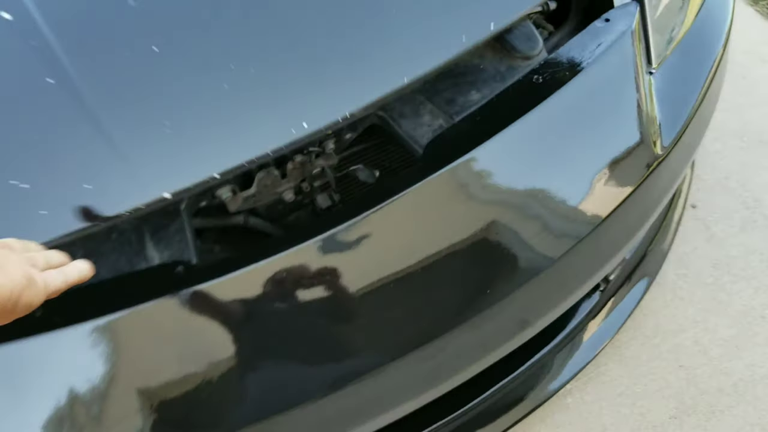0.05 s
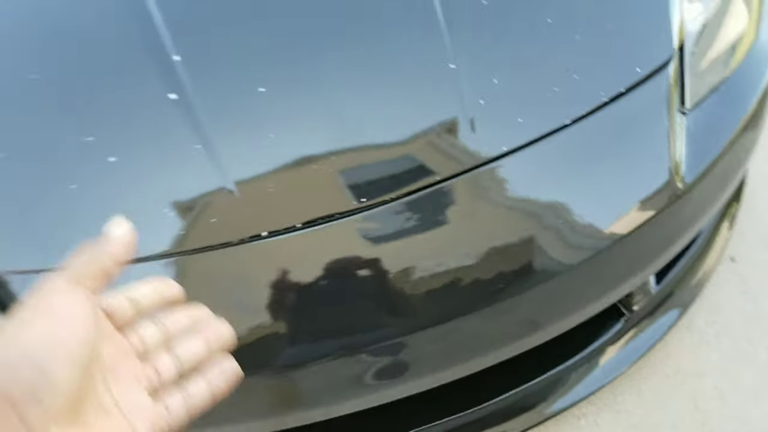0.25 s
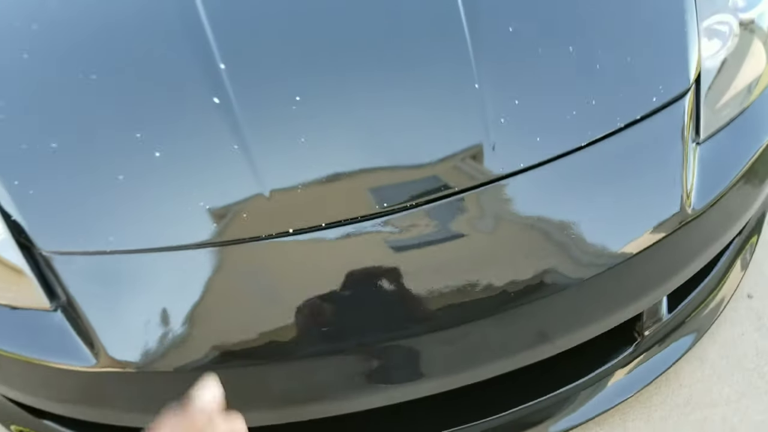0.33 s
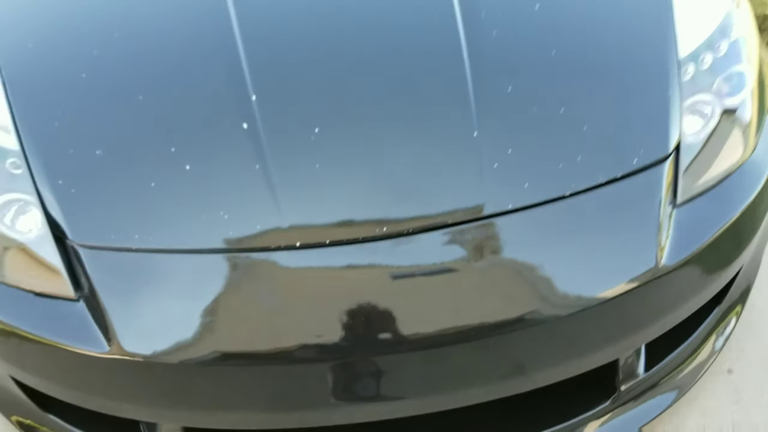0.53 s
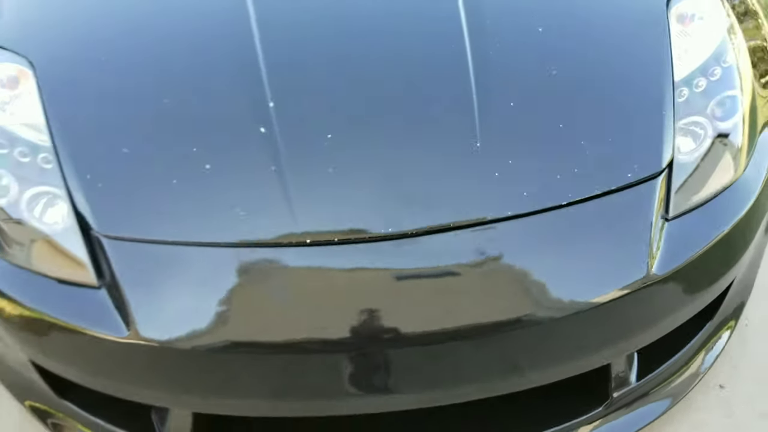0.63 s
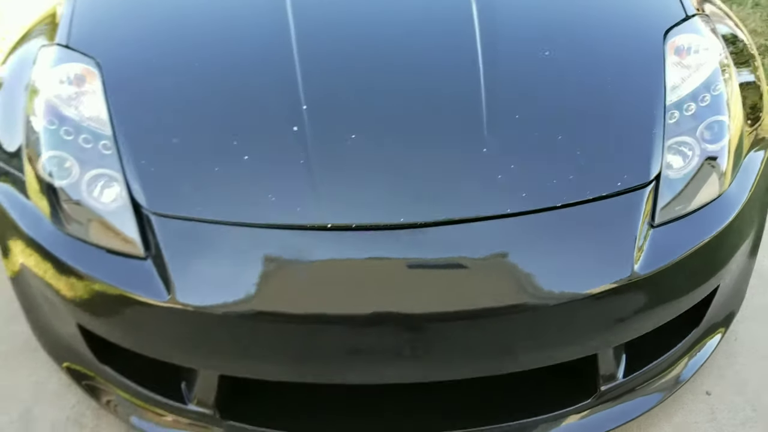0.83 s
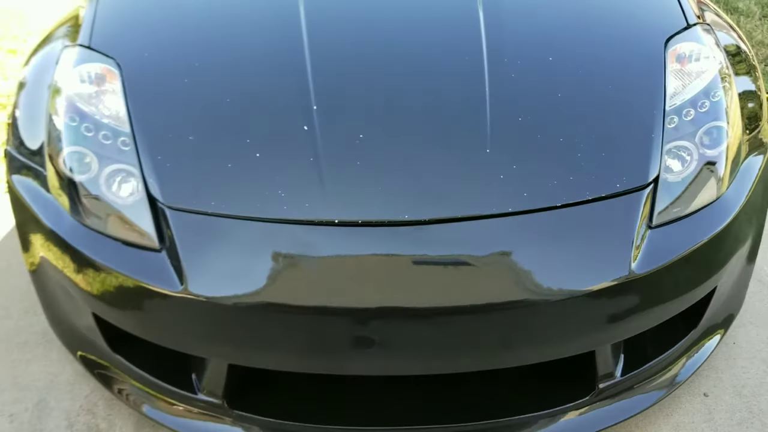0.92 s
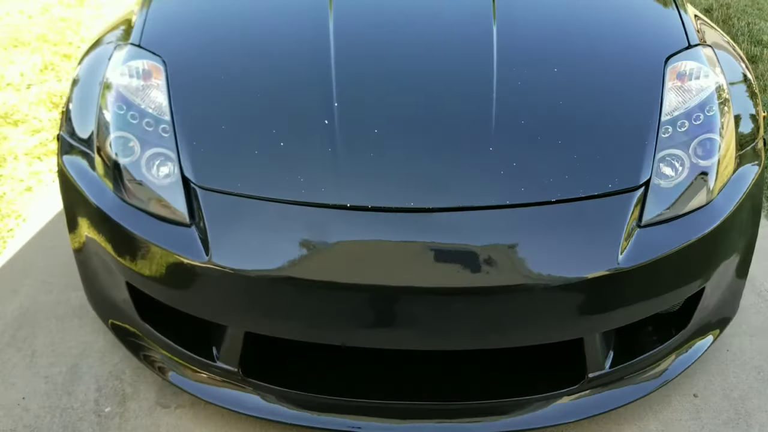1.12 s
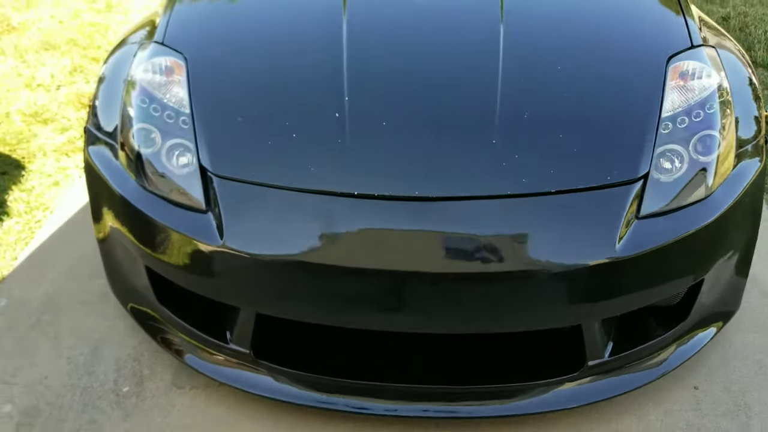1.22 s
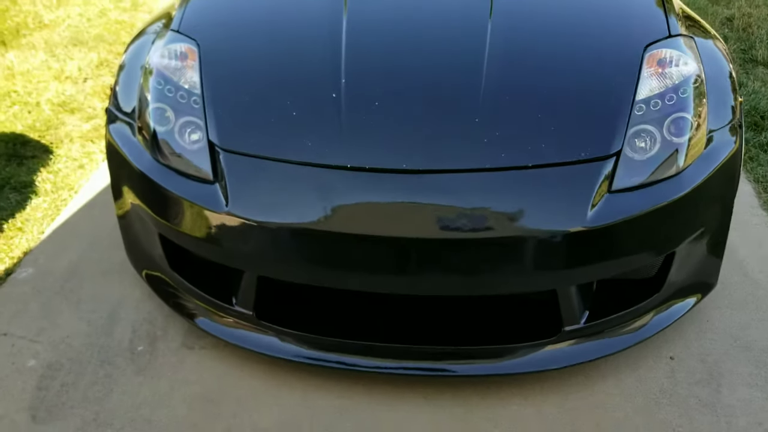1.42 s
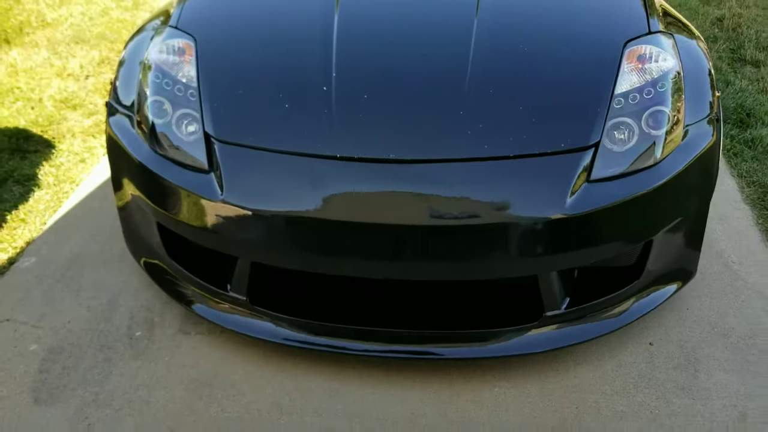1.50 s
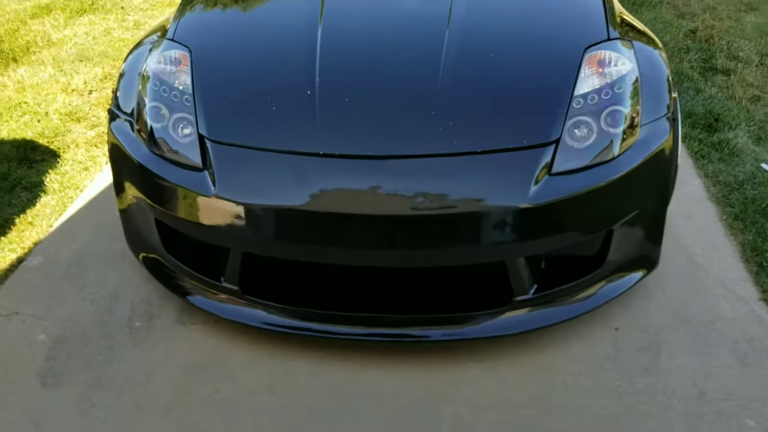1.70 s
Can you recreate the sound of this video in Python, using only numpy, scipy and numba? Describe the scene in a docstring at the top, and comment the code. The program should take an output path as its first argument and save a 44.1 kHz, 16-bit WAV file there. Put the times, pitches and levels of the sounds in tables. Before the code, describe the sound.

Car hood dropped closed up close: sharp latch clatter, heavy panel thud, short hollow ring

```python
"""A driveway beside a house: a car hood drops shut an arm's length from a hand-held stereo recorder.
The latch is a hail of filtered clicks; the panel's thump and rebounds are pushes into decaying modes.
Sheet metal rings on as sines and the walls answer with noise that dies away band by band.
A shoe scuffs grit in cracks and a sinking whistle; soft rustles, distant rumble and mains hum lie under it.
The recorder turns its gain down at the blow."""
import sys
import numpy as np
from scipy import signal
from scipy.fft import rfft, irfft
from scipy.io import wavfile
from scipy.ndimage import uniform_filter1d
from numba import njit

SR = 44100
rng = np.random.default_rng(int(sys.argv[2]) if len(sys.argv) > 2 else 0)


def materialize(psi):
    """Save the field psi as 16-bit PCM at rate SR to the path in sys.argv[1].

    A 1-D psi becomes a single channel; in a 2-D psi each row is a channel.
    """
    bounded = np.clip(np.atleast_2d(psi).T, -1, 1)
    quanta = np.round(bounded * 32767).astype(np.int16)
    wavfile.write(sys.argv[1], SR, quanta)


def how_loud(loudness_db):
    """Turn decibels into a plain amplitude multiplier (0 dB gives 1, 20 dB gives 10)."""
    steps = np.asarray(loudness_db, float) / 20
    return 10 ** steps


N = 77175
T = np.arange(N) / SR  # seconds
HZ = np.maximum(np.arange(N // 2 + 1) * SR / N, 1)
LATCH_START_S = 0.2052
SCRAPE_START_S, SCRAPE_LENGTH_S = 1.1862, 0.138


def read(table, hz):
    """Table value at hz, straight on a log-frequency axis."""
    points = np.array(table, float)
    return np.interp(np.log(hz), np.log(points[:, 0]), points[:, 1])


def unit(x):
    """Scale to rms 1."""
    return x / np.sqrt(np.mean(x ** 2))


def colour(x, table):
    """Causal filter with the given spectrum, made minimum-phase by folding its cepstrum."""
    hz = np.maximum(np.arange(2049) * SR / 4096, 1)
    cepstrum = irfft(np.log(how_loud(read(table, hz))))
    cepstrum[1:2048] *= 2
    cepstrum[2049:] = 0
    impulse = irfft(np.exp(rfft(cepstrum)))
    return signal.fftconvolve(x, impulse[None], axes=1)[:, :N]


def pair(a, b):
    """Left and right from two signals, mixed as mid and side to a set likeness at each frequency."""
    # How alike left and right are. Each row: frequency in Hz, likeness (held to 0..1 below).
    likeness = [(60, 0.82), (130, 1), (290, 0.75), (640, 0.54), (1410, -0.17), (3100, -0.098), (6820, 0.37),
                (15000, -2)]
    alike = np.clip(read(likeness, HZ), 0, 1)
    mid = rfft(a) * np.sqrt(1 + alike)
    side = rfft(b) * np.sqrt(1 - alike)
    return irfft(np.array([mid + side, mid - side]), N) / np.sqrt(2)


def noise():
    """Stereo white noise with the shared likeness of left and right."""
    return pair(*rng.standard_normal((2, N)))


def lean(x, table):
    """Left-right balance by frequency."""
    half_db = read(table, HZ) / 2
    return irfft(rfft(x) * how_loud(np.array([half_db, -half_db])), N)


def fade(t0, t60):
    """Silent before t0, then an exponential decay of 60 dB in t60 seconds."""
    return (T >= t0) * how_loud(-60 * np.maximum(T - t0, 0) / t60)


def ring(x, modes):
    """Sum of decaying sine modes driven by x."""
    bank = sum(how_loud(db) * fade(0, t60) * np.sin(2 * np.pi * hz * T) for hz, db, t60 in modes)
    return signal.fftconvolve(x, bank[None], axes=1)[:, :N]


def drift(samples):
    """Slow random wander of rms 1: noise averaged over a window."""
    return unit(uniform_filter1d(rng.standard_normal(N), samples))


def outdoors():
    """Distant rumble and hiss as filtered noise that drifts a little, with wavering hum lines."""
    # Colour of the rumble and hiss. Each row: frequency in Hz, relative spectrum level in dB.
    floor_colour = [(15, -57.5), (25, -25.5), (43, -9.5), (102, -6), (206, -21), (242, -7.5), (270, -22),
                    (344, -14.5), (373, -23.5), (531, -23), (575, -29.5), (624, -25.5), (1040, -25),
                    (1330, -30.5), (1940, -32), (16000, -58)]
    # Mains hum lines. Each row: frequency in Hz, middle level in dB.
    hum_lines = [(58, -53.5), (120, -59.5), (181, -58.5), (239.5, -58)]
    # Balance of the surroundings. Each row: frequency in Hz, left minus right in dB.
    floor_balance = [(60, 4.5), (110, 3), (200, 1.5), (380, 6.5), (700, 5), (1290, 7.5), (2380, 2.5),
                     (4400, -1.5), (8120, 1.5), (15000, 4)]
    bed = how_loud(-47.5 + 0.27 * drift(6000)) * unit(colour(noise(), floor_colour))
    hum = 0
    for hz, db in hum_lines:
        line = np.sqrt(2) * np.sin(2 * np.pi * (hz * T + rng.random()))
        hum = hum + how_loud(db + 1.5 * drift(5000)) * line
    return lean(bed + hum, floor_balance)


def rustles():
    """Brief soft puffs of band-limited noise under bell-shaped envelopes."""
    # Hand or clothing. Each row: centre in seconds, length in seconds, level in dB,
    # centre frequency in Hz, width in Hz.
    puffs = [(.135, 0.04, -45.5, 2398, 2510), (0.693, 0.016, -50, 3940, 4940),
             (1.415, 0.011, -57.5, 2515, 1498)]
    spectrum, out = rfft(noise()), 0
    for t, length, db, hz, width in puffs:
        puff = unit(irfft(spectrum * np.exp(-((HZ - hz) / width) ** 2), N))
        out = out + how_loud(db) * np.exp(-2 * ((T - t) / length * 2) ** 2) * puff
    return out


def whistle_hz(t):
    """Pitch of the scraping grit, sinking steadily from start to end."""
    return np.interp(t, [SCRAPE_START_S, SCRAPE_START_S + SCRAPE_LENGTH_S], (4250, 3680))


def grit_cracks(fizz):
    """Each grain cracks with a short double ring at the pitch of the whistle, plus gritty noise."""
    # Cracking grains. Each row: start in seconds, level in dB.
    grains = [(1.1864, -26), (1.1885, -27.5), (1.2096, -32.5), (1.2234, -35), (1.24, -30), (1.2564, -38.5),
              (1.2814, -40.5), (1.2884, -27.5), (1.2984, -28.5), (1.3103, -26.5), (1.3174, -35)]
    t60_s, rise_s = 0.012, 0.0004
    low_ratio, low_db, fizz_db = 0.538, -14.5, -8  # lower partial and noise, against the main ring
    out = 0
    for t, db in grains:
        phase = 2 * np.pi * whistle_hz(t) * (T - t)
        crack = np.sin(phase) + how_loud(low_db) * np.sin(low_ratio * phase) + how_loud(fizz_db) * fizz
        out = out + how_loud(db) * fade(t, t60_s) * np.clip((T - t) / rise_s, 0, 1) * crack
    return out


def scrape(fizz):
    """Uneven gritty noise with a sinking whistle: a sine multiplied by slow noise."""
    fizz_db, whistle_db, whistle_width_hz, pan_db = -52.5, -45.5, 600, 2.5  # pan: left minus right
    uneven = how_loud(1.5 * np.repeat(rng.exponential(size=N // 60 + 1), 60)[:N])  # steps of 60 samples
    lowpass = np.exp(-(2 * HZ / whistle_width_hz) ** 2)
    slow = unit(irfft(rfft(rng.standard_normal((2, N))) * lowpass, N))
    whistle = slow * np.cos(2 * np.pi * np.cumsum(whistle_hz(T)) / SR)
    rise = (T - SCRAPE_START_S) / 0.002
    fall = (SCRAPE_START_S + SCRAPE_LENGTH_S - T) / 0.008
    envelope = np.clip(np.minimum(rise, fall), 0, 1)
    pan = how_loud(np.array([[pan_db], [-pan_db]]) / 2)
    return envelope * uneven * (how_loud(fizz_db) * fizz + how_loud(whistle_db) * whistle) * pan


def shoe():
    """A shoe on grit: cracking grains over a scrape, both drawing on one filtered noise."""
    # Colour of the gritty noise. Each row: frequency in Hz, relative spectrum level in dB.
    grit_colour = [(600, -40.5), (1200, -19.5), (1940, -7.5), (2810, -14), (4000, -11.5), (6860, -19.5),
                   (8550, -47), (11800, -45), (14800, -13), (16000, -25)]
    fizz = unit(colour(noise(), grit_colour))
    return grit_cracks(fizz) + scrape(fizz)


def rush():
    """Air pushed out by the falling hood: steady filtered noise, cut off as the latch starts."""
    # Colour of the air. Each row: frequency in Hz, relative spectrum level in dB.
    air_colour = [(180, -31.5), (300, -3.5), (470, -9), (1030, -9.5), (3240, -21), (6200, -23), (8640, -41),
                  (12300, -33.5), (16000, -37)]
    return how_loud(-53) * unit(colour(noise(), air_colour)) * (T < LATCH_START_S)


def wash():
    """Bodywork ringing and wall echoes: noise bands each die at their own rate, with a slower tail."""
    # Colour of the dense ringing. Each row: frequency in Hz, relative spectrum level in dB.
    wash_colour = [(76, -32), (130, -4.5), (248, -9), (279, -11), (427, -12), (472, -14.5), (780, -20),
                   (1170, -25.5), (1610, -26), (4500, -33), (16000, -51)]
    # Decay of the ringing. Each row: frequency in Hz, time to fall 60 dB in seconds.
    wash_decay = [(150, 0.37), (400, 0.47), (1000, 0.54), (2500, 0.48), (6000, 0.46), (10000, 0.28),
                  (15000, .45)]
    start_s, rise_s, rise_cycles = 0.207, 0.018, 2.7  # lows build up later
    far_db, far_stretch = -14, 2.31  # slower second slope from farther walls
    spectrum, out = rfft(unit(colour(noise(), wash_colour))), 0
    for hz in 100 * 2 ** (np.arange(23) / 3):  # third-octave bands
        window = np.cos(np.pi / 2 * np.clip(3 * np.log2(HZ / hz), -1, 1)) ** 2
        band = irfft(spectrum * window, N)
        t60 = read(wash_decay, hz)
        rise = np.clip((T - start_s) / (rise_s + rise_cycles / hz), 0, 1)
        decay = fade(start_s, t60) + how_loud(far_db) * fade(start_s, t60 * far_stretch)
        out = out + band * rise * decay
    return how_loud(-7.5) * out


def latch():
    """A quick hail of random metal clicks, filtered; each octave holds for its own time, then decays."""
    # Colour of the clatter. Each row: frequency in Hz, relative spectrum level in dB.
    latch_colour = [(290, -36.5), (500, -4), (1140, 1), (1690, -7.5), (2260, -2.5), (2980, -10),
                    (3810, -0.5), (5090, -3), (7980, -17.5), (13600, -16), (14700, -6), (16000, -27)]
    # Time before the decay, shortest at the top. Each row: frequency in Hz, hold in seconds.
    hold_times = [(500, .02), (2000, .016), (5000, 0.014), (9000, 0.022), (15000, .006)]
    clicks_per_s, spread_db = 14000, 1.5
    attack_s, t60_s = 0.003, 0.09
    hits = rng.random((2, N)) < clicks_per_s / SR
    strength = rng.standard_normal((2, N)) * how_loud(spread_db * rng.exponential(size=(2, N)))
    spectrum, out = rfft(unit(colour(pair(*(hits * strength)), latch_colour))), 0
    for hz in 250 * 2 ** np.arange(7):  # octave bands
        window = np.cos(np.pi / 2 * np.clip(np.log2(HZ / hz), -1, 1)) ** 2
        band = irfft(spectrum * window, N)
        since_hold = np.maximum(T - LATCH_START_S - read(hold_times, hz), 0)
        out = out + band * how_loud(-60 * since_hold / t60_s)
    return how_loud(-8) * np.clip((T - LATCH_START_S) / attack_s, 0, 1) * out


def sheet_metal():
    """Sheet metal that sings on after the main blow: decaying sines that start together."""
    # Pitches of the sheet, each in Hz.
    sheet_hz = [55, 161, 182, 322, 364, 379, 517, 641, 797, 958]
    # Strength of each pitch in turn. Each row: level in dB, time to fall 60 dB in seconds.
    sheet_decay = [(-14, 0.63), (-20.5, 1.78), (-27.5, 2), (-30, 1.4), (-34, 2.2), (-31.5, 0.8),
                   (-35.5, 1.2), (-34.5, 1.4), (-33, .8), (-43, 1.0)]
    start_s, out = 0.2296, 0
    for hz, (db, t60) in zip(sheet_hz, sheet_decay):
        out = out + how_loud(db) * fade(start_s, t60) * np.sin(2 * np.pi * hz * (T - start_s))
    return out


def panel():
    """Thump and rebounds: each blow is a half-sine push into the same modes; the sheet sings on."""
    # Blows of the panel. Each row: start in seconds, level in dB, push length in seconds,
    # signed strength (negative down on the stops, positive up against the catch).
    blows = [(0.2064, -18.5, .002, -1), (0.2158, 10, 0.0072, -0.74), (0.2177, 5, 0.0031, 0.94),
             (.2296, 5.5, 0.0016, -0.8), (0.2412, 8, .008, -0.51), (0.2608, -13, 0.0027, 0.86),
             (0.2792, -11, 0.0027, 1), (0.2879, -5.5, 0.0054, -1.23), (0.3116, -7.5, 0.0037, 0.71)]
    # Panel and engine bay, damped by the rubber stops. Each row: frequency in Hz, level in dB,
    # time to fall 60 dB in seconds.
    body_modes = [(79, 0.5, 0.28), (92, -14.5, 0.55), (105.74, 2, .5), (170.56, -10, .4),
                  (255.5, -16, 0.21), (278.1, -1.5, 0.19), (379.5, -7.5, .3), (497, -17, 0.15),
                  (598, -14.5, .3), (716, -31, 0.33), (779.6, -22.5, 0.36), (942, -30.5, .3)]
    push = 0
    for t, db, length, way in blows:
        half_sine = np.sin(np.pi * np.clip((T - t) / length, 0, 1))
        push = push + way * how_loud(db) / (length * SR) * half_sine
    return ring(np.array([push, push]), body_modes) - sheet_metal()


def scene():
    """Surroundings, shoe and hood."""
    # Balance of the closing hood. Each row: frequency in Hz, left minus right in dB.
    hood_balance = [(60, 1.5), (110, 3), (200, 4), (380, 2.5), (700, 4.5), (1290, 7), (2380, 0),
                    (4400, -6.5), (8120, 2), (15000, 8)]
    hood = lean(latch() + panel() + wash(), hood_balance)
    return outdoors() + rustles() + shoe() + rush() + hood


@njit
def follow(x, up, down):
    """Peak follower: closes a fixed share of the gap each sample, one share rising, one falling."""
    level, out = 0., np.empty(len(x))
    for i in range(len(x)):
        level += (x[i] - level) * (up if x[i] > level else down)
        out[i] = level
    return out


def roll_off(x):
    """The treble ends steeply here."""
    return signal.sosfilt(signal.butter(12, 16650, fs=SR, output="sos"), x)


def record(dry):
    """Microphone bass cut; gain control ducks at the blow and recovers very slowly; peaks clip."""
    knee_db, slope, attack_s, release_s = -22.5, 0.33, 0.0041, 60
    bass_cut = signal.butter(2, 40, "high", fs=SR, output="sos")  # Hz
    heard = signal.sosfilt(bass_cut, dry)
    level = follow(np.abs(heard).max(axis=0), 1 / (attack_s * SR), 1 / (release_s * SR))
    gain = np.maximum(level / how_loud(knee_db), 1) ** -slope
    return roll_off(np.clip(heard * gain, -1, 1))


dry = scene()
out = record(dry)
materialize(out)
```